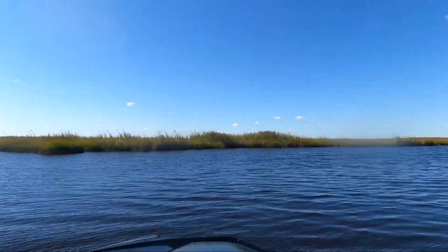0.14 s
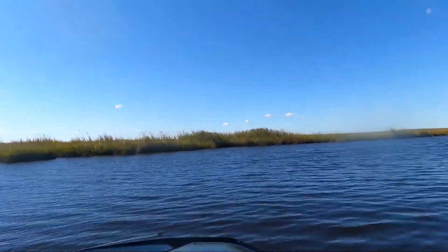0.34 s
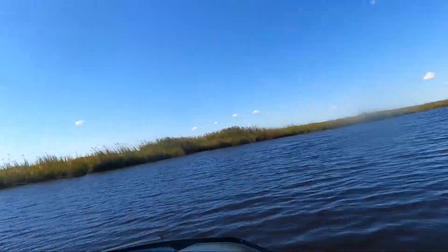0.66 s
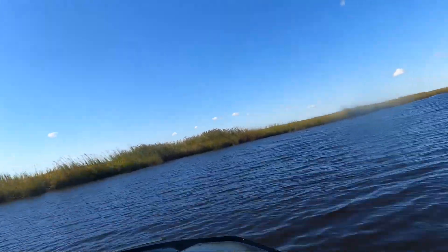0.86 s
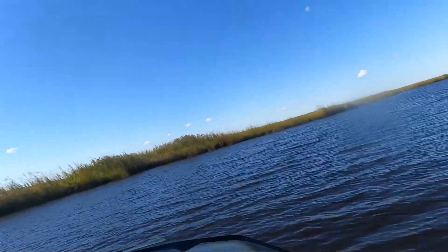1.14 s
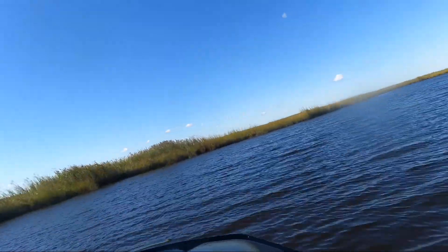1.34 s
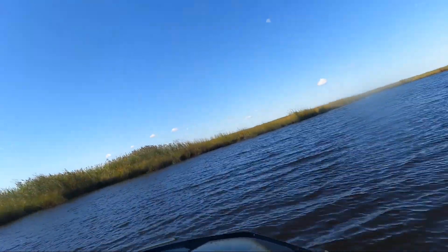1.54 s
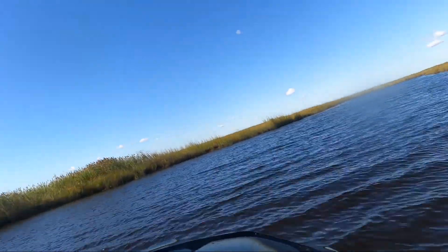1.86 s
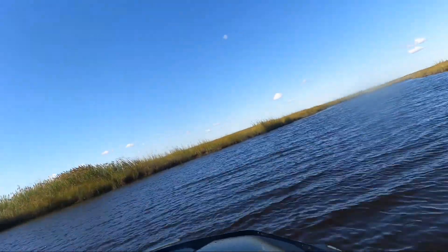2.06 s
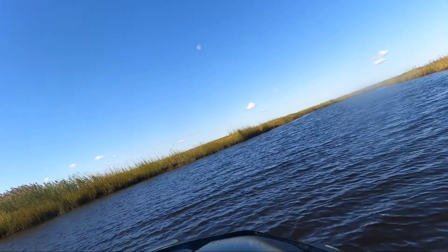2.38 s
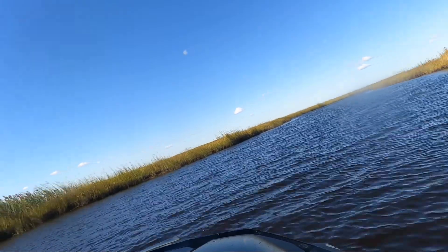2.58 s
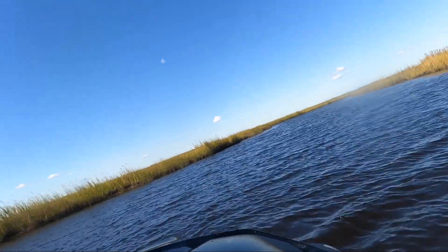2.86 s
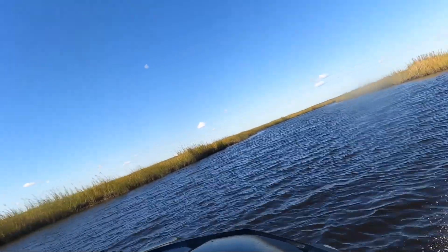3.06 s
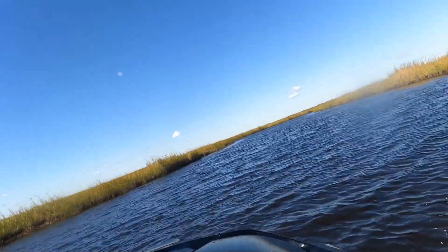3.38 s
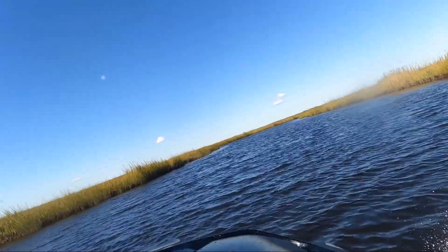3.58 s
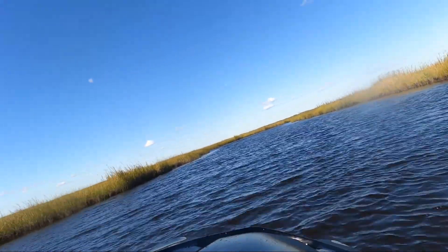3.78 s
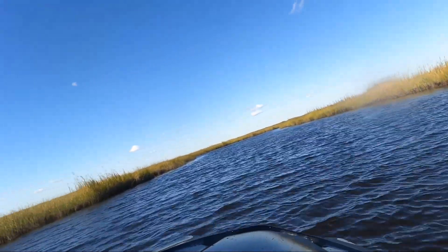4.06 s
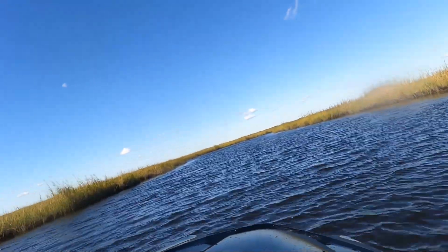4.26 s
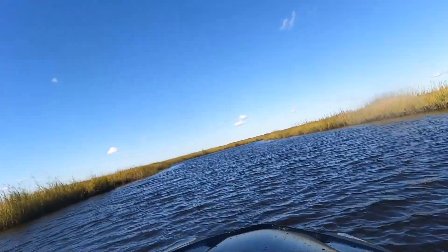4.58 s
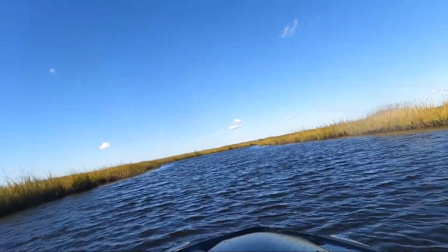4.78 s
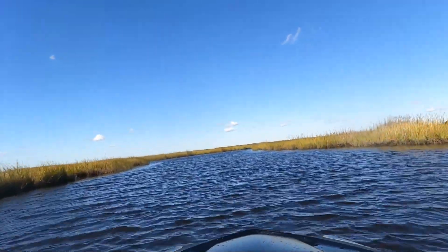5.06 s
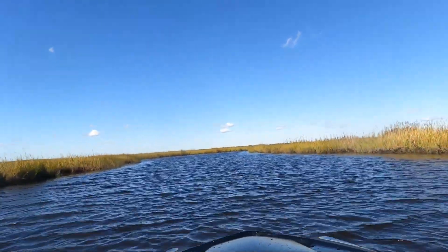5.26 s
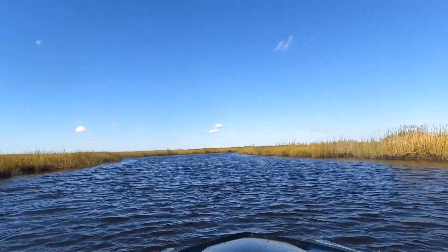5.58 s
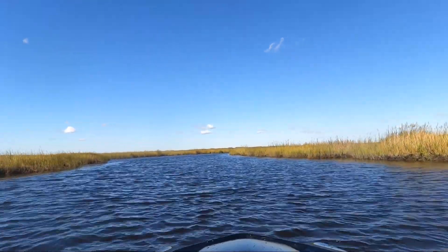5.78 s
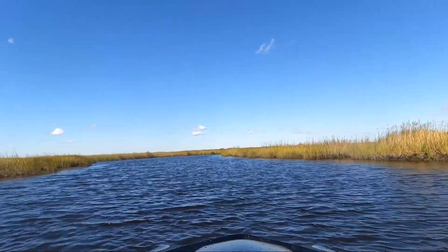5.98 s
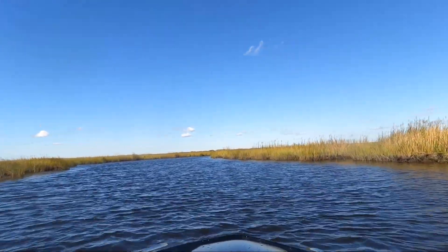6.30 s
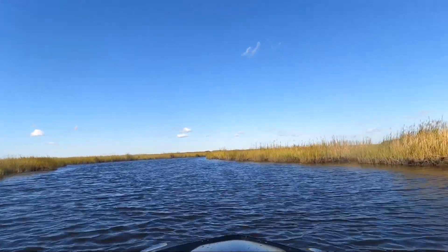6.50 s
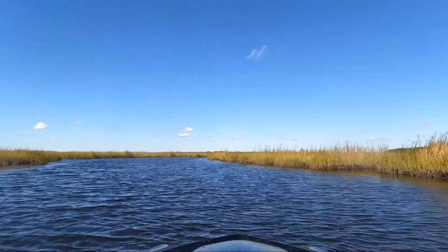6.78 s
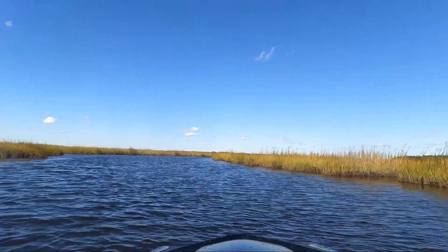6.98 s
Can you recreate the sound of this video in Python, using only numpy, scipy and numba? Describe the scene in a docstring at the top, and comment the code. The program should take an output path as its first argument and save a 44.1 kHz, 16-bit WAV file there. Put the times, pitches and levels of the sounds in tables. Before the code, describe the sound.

Wind buffets the microphone on a cruising personal watercraft; spray swells through a turn before the booming engine slows and fades.

```python
"""On a marsh channel, a jet craft with a three-cylinder four-stroke engine leans through a long turn.
We listen on board. The firings boom in the hull and fade when the throttle eases. Panels knock, a gear
whines faintly and a loose part rattles. Spray hisses louder in the turn, over the roar of gas, pump and
hull. Wind buffets the microphone, and a limiter turns everything down on the wind peaks."""
import sys
import numpy as np
from scipy import signal
from scipy.fft import rfft, irfft, next_fast_len
from scipy.io import wavfile
from scipy.ndimage import uniform_filter1d
from numba import njit

SR = 44100
rng = np.random.default_rng(int(sys.argv[2]) if len(sys.argv) > 2 else 0)


def wav_out(sig):
    """Save sig, one row per channel (or a flat mono array), as 16-bit PCM at SR to the path in sys.argv[1]."""
    wavfile.write(sys.argv[1], SR, np.round(np.clip(np.atleast_2d(sig).T, -1, 1) * 32767).astype(np.int16))


N = 314874
T = np.arange(N) / SR

# Engine speed. Each row: time in seconds, firings per second.
FIRING_RATE = [(0, 101.9), (.6, 100.4), (1.1, 101.4), (1.3, 104.4), (1.4, 104.9), (1.52, 101.5),
               (1.8, 97.8), (1.95, 96.9), (3, 96.7), (4, 97.5), (4.3, 97.2), (5.18, 97.4), (5.24, 94.6),
               (5.37, 92.4), (5.42, 90.4), (5.46, 87.4), (5.55, 86.6), (5.67, 83.6), (5.75, 82.4),
               (5.95, 78.8), (6.15, 77.8), (7.14, 74.3)]
# The boom, at 3 times the firing rate. Each row: time in seconds, level in dB.
BOOM_LEVEL = [(0, -14.5), (.06, -14.5), (.1, -23), (.15, -15), (.72, -15), (.78, -19.5), (.84, -16),
              (1.34, -17), (1.4, -30), (1.46, -15), (1.7, -18), (1.95, -21), (2.7, -18.5), (3.25, -22),
              (4, -18.5), (5.17, -20), (5.21, -22), (5.25, -19.5), (5.36, -20.5), (5.42, -28), (5.46, -21),
              (5.57, -15), (5.72, -22.5), (5.79, -30.5), (7.14, -55)]
# The tone just below the boom. Each row: time in seconds, level in dB.
BELOW_BOOM = [(0, -26), (.3, -29), (.5, -22.5), (.75, -23.5), (.95, -19.5), (1.17, -18), (1.33, -21),
              (1.42, -23.5), (1.55, -20.5), (1.75, -21.5), (2, -27.5), (2.3, -25.5), (3, -25), (3.2, -29.5),
              (3.8, -23), (4.4, -33), (7.14, -42.5)]
# Tones just above the boom. Each row: multiple of the firing rate, dB compared with the boom.
ABOVE_BOOM = [(10 / 3, -16.5), (11 / 3, -29)]
# Swell of the tones at 2 and 4 times the firing rate. Each row: time in seconds, boost in dB.
EVEN_SWELL = [(0, 3), (.7, -3), (1.15, -16), (1.95, 5.5), (2.6, 2.5), (3, 1), (3.5, 4.5), (4.6, -3),
              (4.95, 12), (5.26, 11), (5.38, 2.5), (5.52, 11.5), (5.72, 8.5), (6.05, 1), (6.45, -3.5),
              (7.14, -12)]
# How hard the cylinders tap the panels: one relative level in dB for each.
CYLINDER_TAPS = [-3, -11, -13]
# Ringing hull panels. Each row: pitch in Hz, filter width in Hz, relative level in dB.
PANEL_RINGS = [(796.6, 65, 1), (851.4, 40, 1), (970, 60, 0), (1065, 58, 0.5), (1110, 45, -3.5),
               (1323, 80, -8.5)]
# Humming tones. Each row: multiple of the firing rate, dB at full swell compared with the knock.
HUM_TONES = [(9, -13), (10, -6), (11, -8.5)]
# Knock and hum of the panels. Each row: time in seconds, level in dB.
PANEL_LEVEL = [(0, -39.5), (1.3, -41), (1.6, -43), (1.8, -41.5), (1.92, -37), (3, -36.5), (5.15, -36),
               (5.33, -42.5), (5.55, -40), (5.68, -44), (7.14, -46)]
# Hits of the loose part. Each row: start in seconds, level in dB, pitch in Hz.
LOOSE_HITS = [(5.382, -22, 1085), (5.405, -25, 860), (5.452, -24, 1075), (5.488, -27, 1075),
              (5.75, -29, 980)]
# The gear's whine. Each row: time in seconds, level in dB.
WHINE_LEVEL = [(0, -58), (.11, -55), (.14, -66), (.24, -64), (.29, -57), (.34, -59.5), (.37, -67),
               (.43, -63), (.5, -70), (.85, -70), (1.15, -64), (1.25, -75), (5.36, -78), (5.44, -51),
               (5.52, -73), (5.62, -60), (5.72, -59), (5.76, -70), (5.9, -70), (5.95, -60), (6, -80)]
# Tone colours of wind, spray and roar. Each row: frequency in Hz, relative level in dB.
WIND_COLOUR = [(3, -13), (15, -8.5), (30, -4), (70, -2.5), (140, -6.5), (220, -12.5), (300, -11),
               (400, -24.5), (600, -37.5), (1200, -57.5)]
SPRAY_COLOUR = [(900, -17.5), (1800, 2), (2800, 1.5), (3900, 1), (5000, -1), (6500, -6), (7500, -9),
                (8600, -11), (9400, -14.5), (10000, -19), (11000, -22.5), (12000, -26.5), (13500, -36.5),
                (14300, -45.5), (15000, -54.5)]
ROAR_COLOUR = [(250, -16.5), (400, 0), (550, -2.5), (680, -6), (860, -3), (1120, -8.5), (1220, -11),
               (2000, -19), (2400, -26), (4000, -45), (7000, -55.5)]
# The spray, loudest while the hull leans. Each row: time in seconds, level in dB before the boosts.
SPRAY_LEVEL = [(0, -51.5), (.6, -52), (.78, -50), (1.3, -49.5), (1.42, -46.5), (1.5, -49), (1.78, -44),
               (2.1, -42), (2.15, -39.5), (2.2, -42.5), (2.45, -43.5), (2.72, -43), (2.88, -40.5),
               (2.93, -43), (3.01, -45), (3.05, -43), (3.3, -40.5), (3.87, -41), (3.93, -43.5),
               (4.1, -41.5), (4.2, -43), (4.28, -41.5), (4.52, -45.5), (4.6, -42.5), (4.7, -46), (4.8, -45),
               (4.95, -48), (5.35, -50.5), (5.45, -49), (5.57, -52), (5.63, -49), (7.14, -47)]
# The spray's bright top and its hollow middle. Each row: time in seconds, boost in dB.
SPRAY_TOP = [(0, -1.5), (1.5, 2), (2.4, 1.5), (3, 4), (4.3, 3.5), (5.1, 3.5), (5.75, -4), (7.14, -5.5)]
SPRAY_MIDDLE = [(0, -3.5), (1.7, 2), (2.1, 2), (2.7, 2), (3.1, 4), (3.4, 3), (3.8, 3), (4.2, 1.5), (4.6, 3),
                (5.1, 1), (7.14, -1)]


def engine(firings, firing_hz):
    """Firings boom in the hull. Unequal cylinders add tones a third of the firing rate apart."""
    boom_db, swell_db = curve(BOOM_LEVEL), curve(EVEN_SWELL)
    # As the engine slows, the tone at 4 times the firing rate slides into the hull's own pitch.
    hull_db = 16 * resonance(4 * firing_hz, centre_hz=311, width_hz=28)
    out = tone(firings, 1, -29, flutter_db=3) + tone(firings, 5, -47, flutter_db=2.5)
    out += tone(firings, 2, -34 + swell_db, flutter_db=2.2, slip=.03)
    out += tone(firings, 4, -48.5 + swell_db + hull_db, flutter_db=2.2, slip=.03)
    out += tone(firings, 3, boom_db, flutter_db=.9)
    out += tone(firings, 8 / 3, curve(BELOW_BOOM), flutter_db=1.9, slip=.05)
    for multiple, db in ABOVE_BOOM:
        out += tone(firings, multiple, boom_db + db, flutter_db=3.5, slip=.047)
    return out


def tone(firings, multiple, db, flutter_db, slip=.021):
    """A tone at a multiple of the firing rate. Uneven burns make its level flutter and timing slip."""
    phase = 2 * np.pi * (multiple * (firings + slip * wander(14)) + rng.random())
    return np.sqrt(2) * gain(db + flutter_db * wander(18) + .51 * wander(60)) * np.sin(phase)


def wind():
    """Gusts buffet the microphone with a deep rumble."""
    return gain(-18 + .5 * wander(2.99)) * coloured_noise(WIND_COLOUR, flicker_db=.93, flicker_hz=14)


def roar(firings):
    """Gas, pump and hull noise slowly grows, puffing with each firing and each round of three."""
    puffs = 1 + .048 * np.cos(2 * np.pi * firings) + .041 * np.cos(2 * np.pi * firings / 3)
    return gain(-33.5 + .2929 * T) * coloured_noise(ROAR_COLOUR, flicker_db=1, flicker_hz=14) * puffs


def panel_knock(firings, scatter_db=2.5, rattle_db=-30):
    """Each firing taps the panels over a steady rattle, and each panel rings at its own pitch."""
    count = np.floor(firings + .011 * wander(30)).astype(int)
    hits = np.flatnonzero(np.diff(count) > 0)
    taps = gain(rattle_db) * rng.standard_normal(N)
    cylinder_db = np.array(CYLINDER_TAPS)[count[hits] % 3]
    taps[hits] += gain(cylinder_db + scatter_db * rng.standard_normal(len(hits)))
    out = 0
    for k, (hz, width, db) in enumerate(PANEL_RINGS):
        ring = signal.iirpeak(hz, hz / width, fs=SR)
        delayed = np.roll(taps, int(k * .0037 * SR))  # each panel lies further along the hull
        out += gain(db) * signal.lfilter(*ring, signal.lfilter(*ring, delayed)) / width
    return normalise(out)


def panel_hum(firings, firing_hz):
    """Higher engine tones swell when they match a panel's own pitch."""
    out = 0
    for (multiple, db), (panel_hz, width, _) in zip(HUM_TONES, PANEL_RINGS[1:4]):
        swell = resonance(multiple * firing_hz, panel_hz, width)
        out += swell * tone(firings, multiple, db, flutter_db=2.2, slip=.008)
    return out


def spray(middle_hz=3780, width_hz=760):
    """Water thrown off the hull hisses, surging with each small wave. Finer drops brighten it."""
    hiss = coloured_noise(SPRAY_COLOUR, flicker_db=.22, flicker_hz=25)
    hiss *= gain(.12 * wander(22) + .58 * wander(45))
    coarse = signal.sosfiltfilt(signal.butter(2, 6500, fs=SR, output="sos"), hiss)
    fine = gain(curve(SPRAY_TOP)) * (hiss - coarse)
    middle = signal.lfilter(*signal.iirpeak(middle_hz, middle_hz / width_hz, fs=SR), hiss)
    return gain(curve(SPRAY_LEVEL)) * (coarse + fine + (gain(curve(SPRAY_MIDDLE)) - 1) * middle)


def loose_part(rise_s=.002, ring_s=.11):
    """A loose part rattles as the throttle eases: each hit rings briefly."""
    out = 0
    for start, db, hz in LOOSE_HITS:
        age = np.maximum(T - start, 0)
        loudness = gain(db - 60 * age / ring_s) * (1 - np.exp(-age / rise_s))
        out += loudness * np.sin(2 * np.pi * hz * age)
    return out


def gear_whine(firings):
    """A gear sings a faint, high note that follows the engine's speed."""
    return tone(firings, 31.1, curve(WHINE_LEVEL), flutter_db=2.5, slip=.006)


def gain(db):
    """Turn decibels into a number to multiply by."""
    return 10 ** (np.asarray(db) / 20)


def normalise(x):
    """Scale a signal to an average power of 1."""
    return x / np.sqrt(np.mean(x ** 2))


def curve(table):
    """Join a table's points with straight lines, giving a value for every sample."""
    return np.interp(T, *np.transpose(table))


def resonance(hz, centre_hz, width_hz):
    """How strongly a part answers a tone: 1 at its own pitch, less further away."""
    return 1 / (1 + ((hz - centre_hz) / width_hz) ** 2)


def wander(rate):
    """A smooth random wobble of typical size 1, with `rate` new values a second."""
    hold = int(SR / rate)
    steps = np.repeat(rng.standard_normal(N // hold + 1), hold)
    return normalise(uniform_filter1d(uniform_filter1d(steps, hold), hold)[:N])


def coloured_noise(colour, flicker_db, flicker_hz):
    """Noise with a given tone colour. Each octave flickers on its own."""
    size = next_fast_len(N)
    octave = np.log2(np.maximum(np.arange(size // 2 + 1) * SR / size, 1.))
    hz, db = np.transpose(colour)
    shape_db = np.interp(octave, np.log2(hz), db, left=-90, right=-120)
    spectrum = rfft(rng.standard_normal(size)) * gain(shape_db)
    out = 0
    for centre in range(int(np.log2(hz[0])), int(np.log2(hz[-1])) + 2):
        share = np.clip(1 - np.abs(octave - centre), 0, 1)
        out += irfft(spectrum * share, size)[:N] * gain(flicker_db * wander(flicker_hz))
    return normalise(out)


@njit
def follow_peaks(x, attack, release):
    """Track a signal's peaks, rising quickly and falling slowly."""
    out, level = np.empty(len(x)), 0.
    for i in range(len(x)):
        level += (x[i] - level) * (attack if x[i] > level else release)
        out[i] = level
    return out


def scene():
    """Craft, water and wind add up at one microphone."""
    firing_hz = curve(FIRING_RATE)
    firings = np.cumsum(firing_hz) / SR  # how many firings so far
    craft = gear_whine(firings) + engine(firings, firing_hz) + loose_part()
    panels = gain(curve(PANEL_LEVEL)) * (panel_knock(firings) + panel_hum(firings, firing_hz))
    return (craft + panels + roar(firings) + spray() + wind())[None, :]


def record(dry):
    """A limiter looks just ahead, turns peaks down and rounds them off. Then the top treble is cut."""
    threshold_db, ratio, attack_s, release_s = -12.5, 2.5, .0016, .033
    ceiling, top_hz = .6, 15000
    peak = follow_peaks(np.abs(dry[0]), 1 / (attack_s * SR), 1 / (release_s * SR))
    duck = np.minimum(1, gain(threshold_db) / (peak + 1e-9)) ** (1 - 1 / ratio)
    ahead = int(attack_s * SR)
    limited = gain(1) * dry * np.append(duck[ahead:], np.full(ahead, duck[-1]))
    rounded = limited / (1 + np.abs(limited / ceiling) ** 6) ** (1 / 6)
    fade_in = np.minimum(1, T / .004)
    return signal.sosfilt(signal.ellip(8, .2, 70, top_hz, fs=SR, output="sos"), rounded * fade_in)


dry = scene()
out = record(dry)
wav_out(out)
```